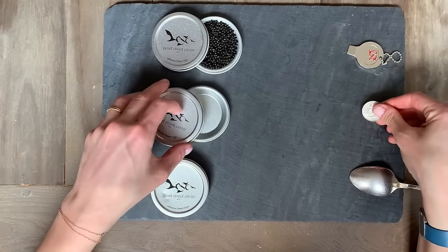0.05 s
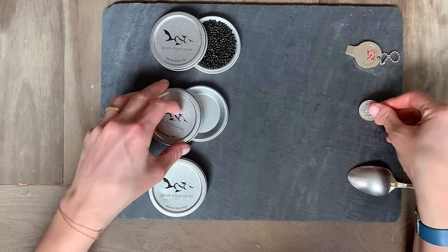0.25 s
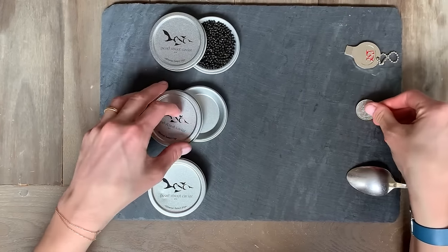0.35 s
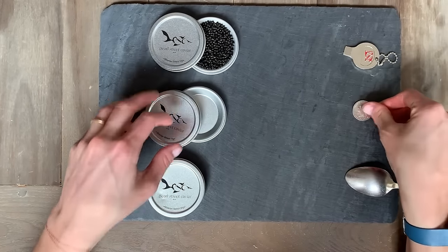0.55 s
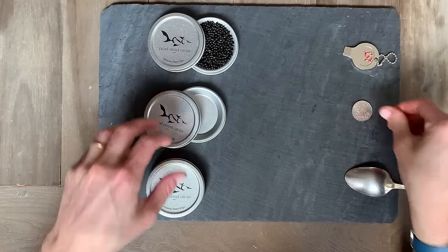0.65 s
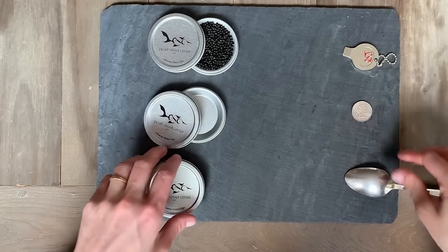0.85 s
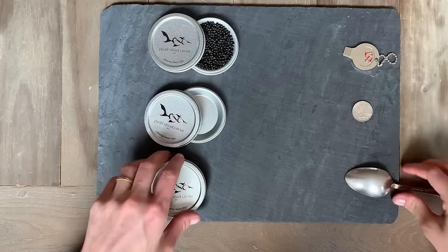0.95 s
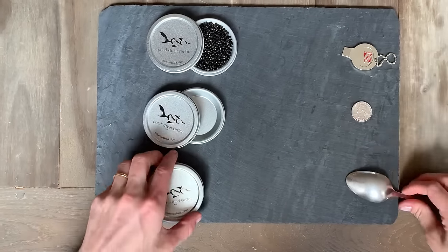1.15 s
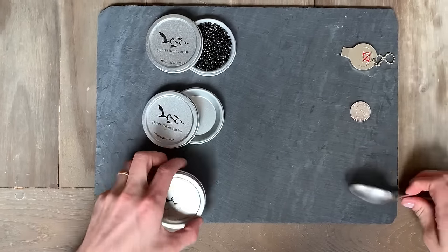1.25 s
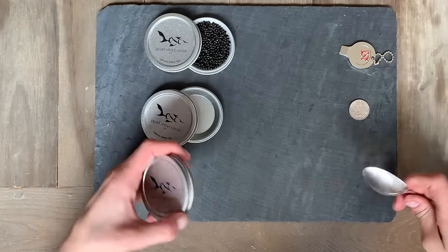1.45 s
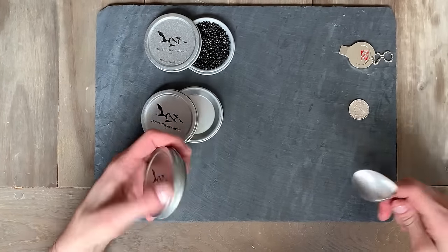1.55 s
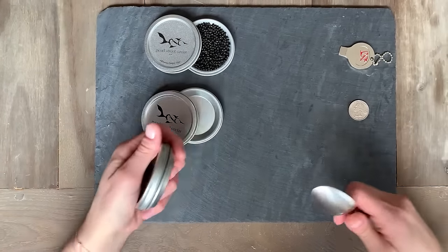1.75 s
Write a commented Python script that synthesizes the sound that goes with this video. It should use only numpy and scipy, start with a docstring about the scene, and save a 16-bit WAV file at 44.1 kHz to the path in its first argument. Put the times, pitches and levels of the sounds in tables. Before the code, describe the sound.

Metal tin lids clack lightly, with a coin chattering flat on slate in between.

```python
"""A tin lid clacks on its tin, close by, over the low rumble of a quiet room. A coin is let go on a
slate board and chatters flat, a second tin is dragged off the slate while a spoon is lifted, and that
tin's lid ticks in the hand. Each impact gives a burst of noise and excites damped normal modes;
sliding friction drives resonances continuously. The room reverberates softly around it all."""
import sys
import numpy as np
from scipy import signal
from scipy.fft import rfft, irfft, next_fast_len
from scipy.io import wavfile
from scipy.ndimage import uniform_filter1d

SR = 44100
rng = np.random.default_rng(int(sys.argv[2]) if len(sys.argv) > 2 else 0)


def wrap_up_sound(samples):
    """Save the sound to the file named by the first command line argument, as 16-bit audio."""
    columns = np.atleast_2d(samples).T
    # keep every value between -1 and 1, then stretch to whole-number steps
    tamed = np.clip(columns, -1, 1)
    steps = np.round(tamed * 32767).astype(np.int16)
    wavfile.write(sys.argv[1], SR, steps)


N = 79380
T = np.arange(SR // 3) / SR  # time since an impact, t/s


def amp(db):
    """Amplitude ratio of a level in decibels."""
    return 10 ** (np.asarray(db) / 20)


def unit(x):
    """Normalisation to rms 1."""
    return x / np.sqrt(np.mean(x ** 2) + 1e-20)


def along(points, hz):
    """Interpolation of (f/Hz, value) points on a logarithmic frequency axis."""
    f, values = np.transpose(points)
    return np.interp(np.log(hz + 1), np.log(f + 1), values)


def filtered(x, response):
    """Linear filtering: the spectrum of x is multiplied by a frequency response."""
    n = x.shape[-1]
    padded = next_fast_len(n + SR // 8)
    return irfft(rfft(x, padded) * response(np.fft.rfftfreq(padded, 1 / SR)), padded)[..., :n]


def shaped(x, curve):
    """Zero-phase filtering by a curve of (f/Hz, gain/dB) points."""
    return filtered(x, lambda hz: amp(along(curve, hz)))


def noise(spectrum, size):
    """Gaussian noise coloured by a spectrum, at rms 1."""
    return unit(shaped(rng.standard_normal(size), spectrum))


def fade(t60):
    """Exponential decay by 60 dB in t60 seconds."""
    return amp(-60 * T / t60)


def stroke(points):
    """Envelope through (t/s, level/dB) points, silent outside them."""
    s, db = np.transpose(points)
    return amp(np.interp(np.arange(N) / SR, s, db, left=-np.inf, right=-np.inf))


def add(track, s, x):
    """Superposition of x on the track from time s."""
    start = round(s * SR)
    track[start:start + len(x)] += x[:N - start]


def ring(modes, damping=1, scatter_db=1.2):
    """Free vibration: damped modes whose levels and phases vary from blow to blow."""
    chance = rng.standard_normal((len(modes), 2))
    return sum(amp(db + scatter_db * a) * fade(t60 / damping) * np.sin(2 * np.pi * hz * T + np.pi * b)
               for (hz, db, t60), (a, b) in zip(modes, chance))


def resonate(x, modes):
    """Forced vibration: x drives parallel (f/Hz, bandwidth/Hz, gain/dB) resonators; output at rms 1."""
    return unit(filtered(x, lambda f: sum(
        amp(db) * 1j * f * width / (f0 * f0 - f * f + 1j * f * width) for f0, width, db in modes)))


def soften(x, cutoff_hz, rise_s):
    """Contact compliance: a softer blow is duller and starts less abruptly."""
    lowpass = signal.butter(2, min(cutoff_hz, .45 * SR), fs=SR, output="sos")
    return signal.sosfilt(lowpass, x * (1 - np.exp(-T / rise_s)))


def rumble():
    """Stationary background noise with its energy at low frequencies."""
    # rumble spectrum: f/Hz, relative level/dB
    spectrum = [(20, -7), (48, 4), (70, -10), (110, -3), (180, -6), (280, -12), (500, -17.5), (1000, -26),
                (2000, -34.5), (4000, -51), (8000, -53.5), (16000, -63)]
    return amp(-48.5) * noise(spectrum, N)


def room(x):
    """Reverberation: convolution with a diffuse tail that lasts longest near 4 kHz."""
    # reverberation time: f/Hz, T60/s
    decay_times = [(200, 0.34), (1500, 0.65), (4000, 0.78), (8000, 0.42), (11000, 0.31), (15500, 0.28)]
    # spectrum of the tail: f/Hz, level/dB
    colour = [(200, 2), (500, 0), (1200, -11.5), (3500, -15), (8000, -12), (12000, -23.5), (15500, -19)]
    hz, t, bands = signal.stft(rng.standard_normal(SR), SR, nperseg=256)
    decay = amp(-60 * t / along(decay_times, hz)[:, None])
    band_energy = np.mean(decay ** 2, axis=1, keepdims=True) * SR
    decay *= amp(along(colour, hz))[:, None] / np.sqrt(band_energy)
    tail = signal.istft(bands * decay, SR, nperseg=256)[1]
    build_up = 1 - np.exp(-np.arange(len(tail)) / SR / .0017)
    return signal.fftconvolve(x, tail * build_up)[:N]


def spoon():
    """Friction at the sliding edge sustains a thin whine; short rasps excite the spoon's modes."""
    # resonances while sliding: f/Hz, bandwidth/Hz, gain/dB
    whine_modes = [(11090, 70, 3), (14000, 200, 0)]
    # envelope of the slide: t/s, level/dB
    slide = [(1.14, -104), (1.22, -58), (1.26, -84), (1.295, -71), (1.345, -63), (1.38, -93)]
    # catches on the slate: t/s, level/dB
    touches = [(1.217, -49), (1.2833, -37.5), (1.2979, -38.5), (1.314, -37.5)]
    # the spoon's modes: f/Hz, level/dB, T60/s
    modes = [(4387, -1, .06), (4667, -2, .06), (5760, -3, .1), (6245, -5, .14), (7483, -11, .16),
             (9150, -9, .07), (11070, -9, .11)]
    # rasp spectrum: f/Hz, level/dB
    rasp = [(400, -23), (1700, 10.5), (2800, 12.5), (4500, 7.5), (6500, 1), (9000, -2.5), (11000, -5),
            (16000, -48)]
    whine = resonate(rng.standard_normal(N), whine_modes)
    out = resonate(whine, whine_modes) * stroke(slide)  # a second pass narrows the peaks
    for s, db in touches:
        touch = ring(modes) + amp(5) * noise(rasp, len(T)) * fade(.044)
        add(out, s, amp(db) * soften(touch, cutoff_hz=.45 * SR, rise_s=.00034))
    return out


def dragged_tin():
    """Stick-slip friction: many tiny slips of the tin's base on the slate excite its hollow body."""
    # envelope of the drag: t/s, level/dB
    envelope = [(1.10, -82), (1.164, -50.5), (1.22, -50.5), (1.25, -54), (1.285, -49), (1.308, -41.5),
                (1.322, -36.5), (1.346, -38.5), (1.357, -47), (1.38, -48)]
    # scraping spectrum: f/Hz, level/dB
    spectrum = [(150, -27), (300, -9.5), (430, -5.5), (520, -10), (640, -0.5), (1050, -4.5), (1220, -3.5),
                (1600, -5.5), (2100, -13.5), (3500, -13.5), (5500, -23), (9000, -30), (14000, -58)]
    # body resonances: f/Hz, bandwidth/Hz, gain/dB
    modes = [(380, 200, -2), (610, 150, -3), (1230, 140, 1), (1560, 200, -1)]
    slips_per_s = 1500
    slips = unit((rng.random(N) < slips_per_s / SR) * rng.standard_normal(N))
    grit = unit(shaped(slips + rng.standard_normal(N), spectrum))
    return (amp(-2.5) * grit + amp(-3.5) * resonate(grit, modes)) * stroke(envelope)


def held_tin():
    """Impact excitation: the loose lid ticks against the tin as the hand turns it."""
    # ticks of the lid: t/s, level/dB, cutoff f/Hz
    ticks = [(1.4844, -15, 12900), (1.4915, -23.5, 8900), (1.5305, -33, 4500), (1.663, -41, 6600),
             (1.67, -24, 1456)]
    # the tin's modes: f/Hz, level/dB, T60/s
    modes = [(1466, -6, .06), (2509, -11, .05), (3542, -3, .034), (4060, -2.5, .052), (4958, -12, .03),
             (6654, -4, .02), (8349, -11, .025), (9100, -6, .018), (13160, -8, .022)]
    # clatter spectrum: f/Hz, level/dB
    clatter = [(300, 9), (1500, 0), (3800, 6.5), (5500, -4), (9000, 9.5), (11500, -8), (13300, 5),
               (16500, -28)]
    out = np.zeros(N)
    for s, db, cutoff_hz in ticks:
        tick = amp(-11) * ring(modes) + amp(-9) * noise(clatter, len(T)) * fade(.021)
        add(out, s, amp(db) * soften(tick, cutoff_hz, rise_s=.0017))
    return out


def coin():
    """Mode splitting: each click of the rim on the slate resets the ring of two beating mode pairs."""
    # rim contacts: t/s, click level/dB, treble tilt/dB, low pair level/dB, high pair level/dB
    contacts = [(0.549, -25.5, -4.5, -48, -37), (0.5522, -21, -12, -48, -37),
                (0.5546, -15, -0.5, -43.5, -17), (0.5577, -15, 1.5, -33.5, -29.5),
                (0.5719, -19.5, 0, -31, -18.5), (0.5885, -23.5, 10.5, -45.5, -23),
                (0.593, -13, -5, -43.5, -23.5), (0.5936, -26, 9.5, -48.5, -16),
                (0.6018, -23, 8, -47, -19.5), (0.613, -20, 4.5, -24.5, -34.5),
                (0.6149, -26, -13.5, -38, -30), (0.6266, -29, 3, -33.5, -24), (0.63, -21, -7.5, -47.5, -23),
                (0.6327, -25.5, 0.5, -50, -21.5), (.6390, -30, -1.5, -58.5, -52)]
    # click spectrum: f/Hz, level/dB
    click_spectrum = [(200, -23), (700, -11), (1200, -1), (1550, -13.5), (2000, -1.5), (2700, -6),
                      (3300, 2), (4400, -8), (6000, -1.5), (7200, -10.5), (8050, 2.5), (8700, -6.5),
                      (9400, 3.5), (11500, -2), (13000, -9), (15500, 0.5), (16300, -30.5)]
    # modes rung by each click: f/Hz, level/dB, T60/s
    slate_modes = [(1228, -13, .05), (2010, -8, .04), (3090, 2, .035), (3420, 2, .03), (8050, -2, .06),
                   (9250, -4, .06), (9750, -5, .05)]
    low_hz, high_hz, split_hz, twin_db = 9370, 15565, 50, -14.5
    free_t60_s, flat_t60_s, kick_rad = .25, .03, .9
    out, t = np.zeros(N), np.arange(N) / SR
    click_envelope = (1 - np.exp(-T / .00047)) * (fade(.0086) + amp(-19) * fade(.18))
    for s, db, tilt_db, _, _ in contacts:
        click = shaped(noise(click_spectrum, len(T)), [(3500, .0058), (12000, tilt_db)])
        add(out, s, amp(db) * (amp(3) * click * click_envelope + amp(-17) * ring(slate_modes)))
    times, _, _, low_db, high_db = np.transpose(contacts)
    latest = np.maximum(np.searchsorted(times, t) - 1, 0)
    t60 = np.where(t > times.max(), flat_t60_s, free_t60_s)  # lying flat damps the coin
    for hz, levels in ((low_hz, low_db), (high_hz, high_db)):
        swing = (t > times[0]) * amp(levels[latest] - 60 * abs(t - times[latest]) / t60)
        kicks = np.cumsum(kick_rad * rng.standard_normal(len(times)))
        phase = 2 * np.pi * hz * t + uniform_filter1d(kicks[latest], size=24)
        pair = np.sin(phase) + amp(twin_db) * np.sin(phase - 2 * np.pi * split_hz * t)
        out += np.sqrt(2) * uniform_filter1d(swing, size=24) * pair
    return out


def lid():
    """Struck sheet metal clatters and rings. Returns the direct sound, in which the contact spot
    favours nearby frequencies, and the sound sent to the room, an even mix with more clatter."""
    # clacks on the tin: t/s, level/dB, cutoff f/Hz, body gain/dB, favoured f/Hz, finger damping factor
    clacks = [(0.2304, -17.5, 11000, -2, 3810, 0.9), (.2495, -35.5, 7400, 6, 3810, 0.5),
              (.2636, -29, 3500, 7.5, 3810, 1.18), (.2708, -38, 3000, 4.5, 2360, 2.1),
              (.2795, -37.5, 3000, 3, 2190, 0.82), (.3380, -17.5, 5000, -1.5, 3800, 2.4),
              (.3506, -14, 13000, -1, 3450, 1.16), (.9942, -28, 3800, 7.5, 3640, 1.76),
              (1.003, -24, 9000, 7.5, 2330, 3.6), (1.006, -23.5, 4000, -1, 3810, 2.1),
              (1.0113, -15, 8420, -1.5, 3960, 0.8), (1.0150, -25.5, 3000, 4.5, 1580, 3.6),
              (1.0195, -22.5, 8000, 6, 2240, 1.55)]
    # the lid's modes: f/Hz, level/dB, T60/s
    modes = [(1250, -7, .045), (1580, -10, .045), (2140, -4, .032), (2261, -4, .032), (3540, -4, .035),
             (3806, -3, .035), (6500, -7, .03), (7078, -10, .045), (7630, -16, .11), (8200, -6, .03),
             (9180, -11, .035), (9530, -4, .04), (9900, -8, .04), (14300, -24, .09)]
    # clatter spectrum: f/Hz, level/dB
    clatter_spectrum = [(200, -21.5), (650, -8.5), (900, -9), (1300, -2), (2300, 4), (2900, -6), (3600, -2),
                        (5000, 0.5), (6500, -4.5), (9800, -0.5), (11500, -6.5), (14500, -15.5),
                        (17000, -38)]
    favour_db, favour_width_hz, rise_cycles = 9, 130, 4
    mode_hz = np.transpose(modes)[0]
    swell = 1 - np.exp(-T * mode_hz[:, None] / rise_cycles)  # low modes build up more slowly
    direct, to_room = np.zeros(N), np.zeros(N)
    for s, db, cutoff_hz, body_db, favoured_hz, damping in clacks:
        favour = amp(favour_db * np.exp(-((mode_hz - favoured_hz) / favour_width_hz) ** 2))
        partials = amp(-4.5) * np.array([ring([mode], damping) for mode in modes]) * swell
        clatter = amp(-4.5) * noise(clatter_spectrum, len(T)) * fade(.038 / damping)
        ping = np.dot(favour, partials) + clatter
        even = partials.sum(axis=0) + amp(3) * clatter
        for path, blow in ((direct, ping), (to_room, even)):
            # flatter contacts bring out more body
            blow = filtered(blow, lambda hz: amp(np.interp(hz, [2300, 3400], [body_db, 0])))
            add(path, s, amp(db) * soften(blow, cutoff_hz, rise_s=.0004))
    return direct, to_room


def scene():
    """Superposition in mid and side: independent tails and rumble partly decorrelate left and right."""
    # reverberation in the side signal: f/Hz, gain/dB
    room_width = [(200, -23), (1200, -5.5), (2500, 0), (8000, -7), (15000, -18)]
    lid_direct, lid_to_room = lid()
    others = coin() + dragged_tin() + spoon() + held_tin()
    to_room = lid_to_room + others
    mid = lid_direct + others + room(to_room) + rumble()
    side = shaped(room(to_room), room_width)
    side += shaped(rumble(), [(40, -43.5), (150, -30), (400, -3)])
    return np.array([mid + side, mid - side])


def record(dry):
    """Stereo widening: a fixed filter shifts phase and level between the sides and cuts the top treble."""
    # lead of the left channel: f/Hz, phase/rad
    lead = [(150, 0), (800, .4), (1200, 0), (2000, -.1), (2600, 1.1), (3600, .2), (4200, .8), (4600, 2.5),
            (5600, 3.6), (7400, 5.8), (8600, 6.3), (11200, 8.9), (13300, 11.3), (15700, 13.1)]
    # balance: f/Hz, left minus right level/dB
    balance = [(50, 0), (200, -2.5), (1100, -.2), (2700, -1.2), (4200, -.1)]
    top_hz, top_order = 15950, 90
    half = np.array([[.5], [-.5]])  # shared oppositely between left and right
    return filtered(dry, lambda hz: np.exp(1j * half * along(lead, hz))
                    * amp(half * along(balance, hz)) / (1 + (hz / top_hz) ** top_order))


dry = scene()
out = record(dry)
wrap_up_sound(out)
```